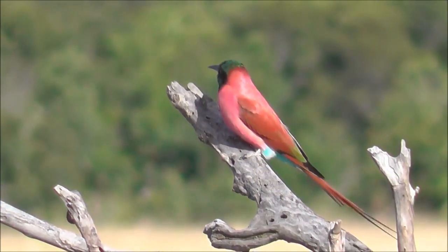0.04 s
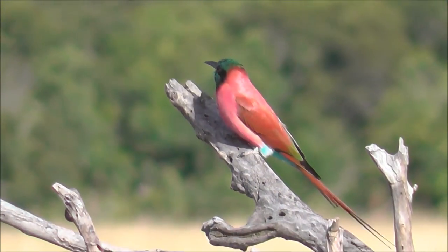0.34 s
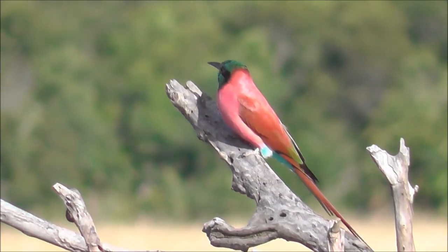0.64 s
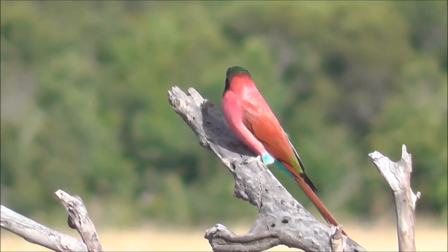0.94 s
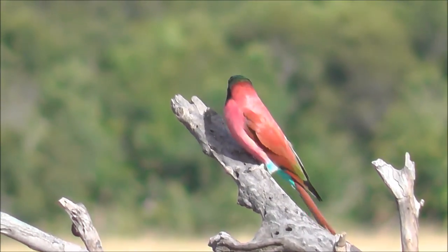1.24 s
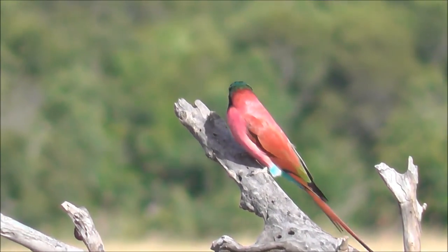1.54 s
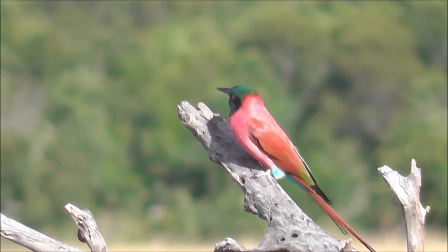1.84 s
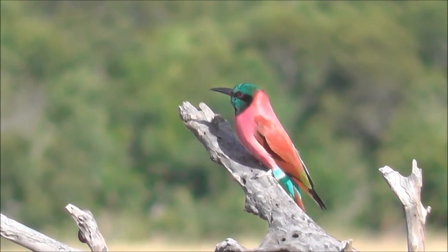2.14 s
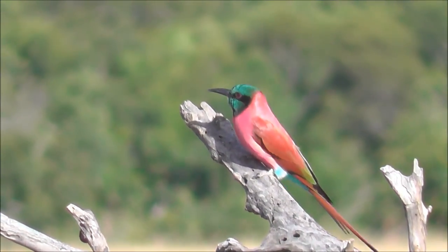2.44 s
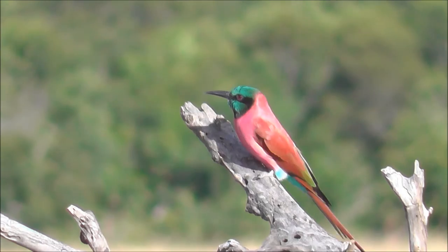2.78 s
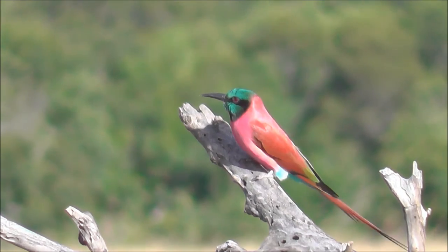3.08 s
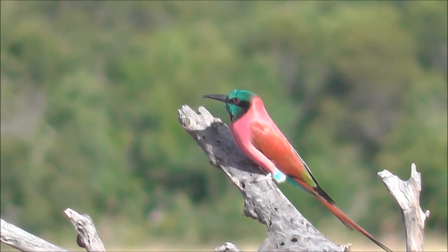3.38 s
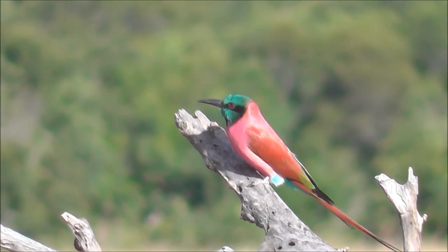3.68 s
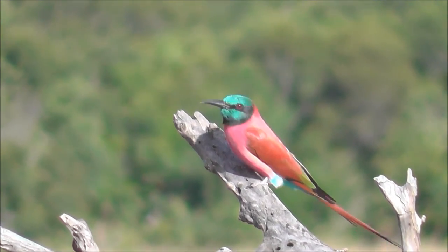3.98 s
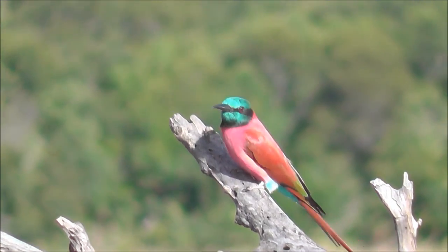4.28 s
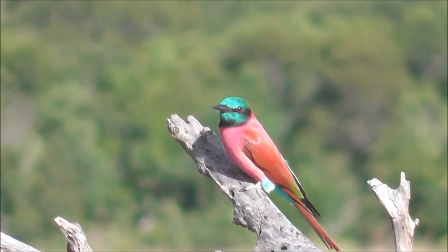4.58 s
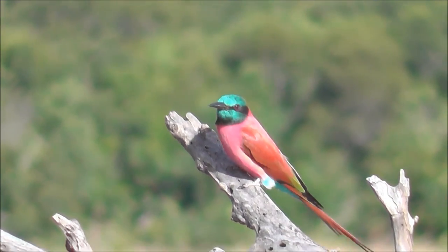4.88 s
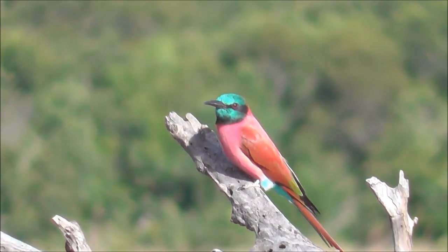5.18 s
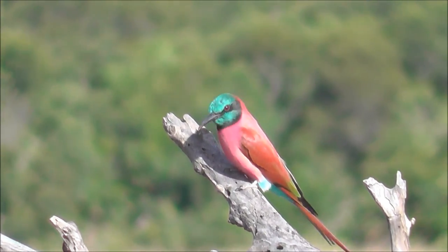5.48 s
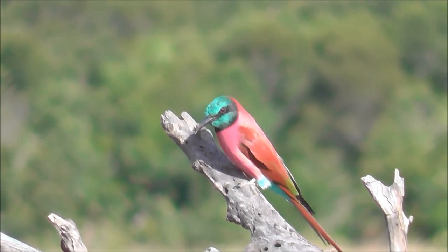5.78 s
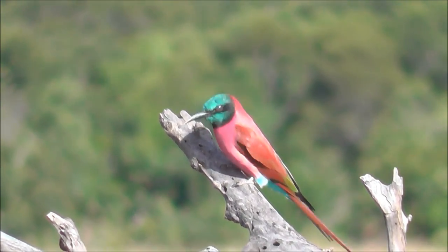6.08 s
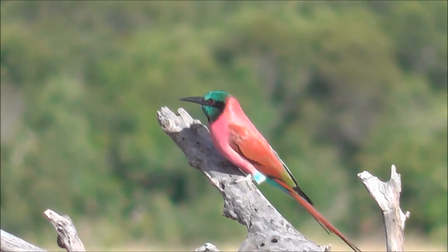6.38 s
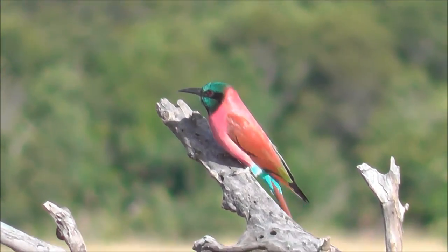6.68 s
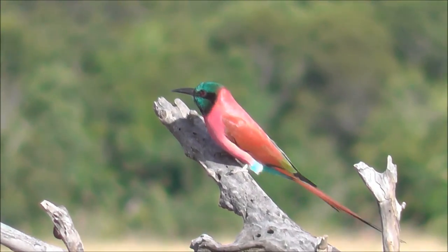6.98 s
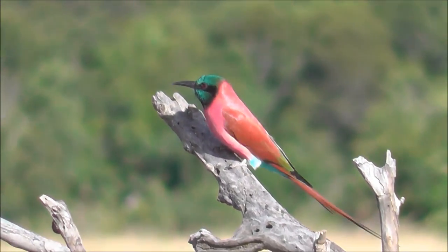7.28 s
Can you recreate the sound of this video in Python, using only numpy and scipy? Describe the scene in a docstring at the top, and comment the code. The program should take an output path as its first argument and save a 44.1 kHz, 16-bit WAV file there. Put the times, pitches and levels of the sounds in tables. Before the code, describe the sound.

A quiet outdoor scene near a wood, with faint high crickets pulsing about three times a second over a low murmur and steady microphone hiss. It opens with a brief soft scuff, a low hum and a puff of wind. Nearby birds give short, high, arched chirps and quick slides from 0.3 to 0.6 seconds, around 2 to 2.4, around 3.5 and at 4.8, with a slight echo. Wind rumbles and thumps on the microphone at 1.2 seconds, more strongly from 1.6 to 2.9, and again around 4.6 to 5.2. A few small dry clicks are scattered about, with one sharp click at 4.8 seconds, and a lens motor ticks very faintly. The busiest flurry of chirps comes from 5.6 to 5.9 seconds, over a barely audible distant bird's whistle. Gusts return from 6.7 seconds and rumble until the end, at about 7.4.

```python
"""Bee-eaters chirp in short arched notes and quick slides at the edge of a wood, which echoes faintly.
Crickets scrape their wings in threes. Gusts rumble and thump on the microphone, and the lens motor
ticks faintly as its steps ring the camera body. There is a brief scuff, a few dry clicks (one sharp)
and a far bird's whistle, all over a low outdoor murmur, a swelling hum and the microphone's hiss."""
import sys
import numpy as np
from scipy import signal
from scipy.fft import rfft, irfft
from scipy.io import wavfile
from scipy.ndimage import uniform_filter1d

SR = 44100
rng = np.random.default_rng(int(sys.argv[2]) if len(sys.argv) > 2 else 0)


def master_out(mix):
    """Clip the mix to full scale and print it as 16-bit PCM to the path in sys.argv[1]."""
    frames = np.transpose(np.atleast_2d(mix))
    ceiling = np.clip(frames, -1, 1)
    pcm = np.round(ceiling * 32767).astype(np.int16)
    wavfile.write(sys.argv[1], SR, pcm)


N = 327663
T = np.arange(N) / SR


def undb(db):
    """Turn decibels into a factor to multiply by."""
    return 10 ** (np.asarray(db) / 20)


def unit(x):
    """Scale a signal to an average strength (rms) of 1."""
    return x / np.sqrt(np.mean(x ** 2))


def colour(x, points):
    """Make some frequencies louder and others softer, along a curve of (f/Hz, gain/dB) points."""
    hz, db = np.transpose(points)
    f = np.maximum(np.fft.rfftfreq(N, 1 / SR), 1)
    return irfft(rfft(x) * undb(np.interp(np.log(f), np.log(hz), db)), N)


def noise(points):
    """Noise of strength 1, shaped by (f/Hz, gain/dB) points."""
    return unit(colour(rng.standard_normal(N), points))


def drift(rate):
    """A smooth random curve of strength 1 that changes about rate times a second."""
    f = np.fft.rfftfreq(N, 1 / SR)
    return unit(irfft(rfft(rng.standard_normal(N)) / (1 + (f / rate) ** 4), N))


def tone(hz):
    """A pure tone that follows a changing pitch."""
    return np.sin(2 * np.pi * np.cumsum(hz) / SR)


def add(out, start, sound):
    """Mix a sound into out at a start time in seconds."""
    i = max(int(start * SR), 0)
    out[i:i + len(sound)] += sound[:max(N - i, 0)]


def tree_echo(x, echo_db, fade_s):
    """Trunks and leaves scatter the sound, adding a short blurred echo."""
    t = T[:SR // 2]
    build_up = 1 - np.exp(-t / 0.042)
    tail = rng.standard_normal(len(t)) * np.exp(-np.log(1000) * t / fade_s) * build_up
    return x + undb(echo_db) * signal.fftconvolve(x, tail / np.linalg.norm(tail))[:N]


def wind_strength(rise_s=0.0044, drop_s=0.0037, wake_db=-8.5, wake_s=0.064, flutter_db=3):
    """Over a fluttering breeze, each gust rises, holds, drops and leaves a wake of weak swirls."""
    # light air between the gusts: t/s, level/dB
    breeze = [(0, -73), (.35, -61), (.7, -59.5), (1.1, -53.5), (1.45, -68), (1.9, -58), (2.7, -55),
              (3.2, -58), (3.6, -67), (4.1, -60), (4.4, -72), (4.9, -61), (5.5, -64), (5.9, -66.5),
              (6.4, -68), (6.85, -57.5), (7.43, -57)]
    # gusts on the microphone: start/s, length/s, level/dB
    gusts = [(0, 0.23, -46.5), (0.049, 0.052, -38), (0.835, 0.17, -52.5), (1.156, 0.063, -36.5),
             (1.62, 0.073, -45), (1.803, 0.014, -51), (2.063, 0.07, -34.5), (2.41, 0.033, -33),
             (2.524, 0.052, -32.5), (2.65, 0.15, -43), (2.81, 0.1, -48), (3.886, 0.077, -53.5),
             (4.605, 0.11, -44.5), (4.992, .16, -46), (5.33, 0.3, -58.5), (6.694, 0.025, -41.5),
             (7.068, 0.099, -41), (7.196, 0.11, -33), (7.31, 0.27, -37)]
    power = undb(np.interp(T, *np.transpose(breeze)) - 1 + flutter_db * drift(16)) ** 2
    for start, length, db in gusts:
        before, after = np.maximum(start - T, 0), np.maximum(T - start - length, 0)
        fade = np.maximum(np.exp(-after / drop_s), undb(wake_db) * np.exp(-after / wake_s))
        power += (undb(db) * np.exp(-before / rise_s) * fade) ** 2
    return uniform_filter1d(np.sqrt(power), size=200)


def wind(rumble_db=0.73, thump_db=-2, swirl_s=0.0012):
    """Swirling air rumbles on the microphone as hard as the wind blows; a big swirl thumps once."""
    # tone colour of the rumble: f/Hz, gain/dB
    spectrum = [(25, -50), (50, -20.5), (80, -8.5), (125, -3), (180, .5), (240, -9), (310, -21.5),
                (400, -35), (480, -42.5), (650, -43), (1000, -45), (2000, -54), (4000, -68), (8000, -82)]
    # big swirls hitting the microphone: t/s, level/dB
    buffets = [(0.097, -26), (1.205, -29), (1.678, -20.5), (2.016, -25.5), (2.065, -35.5), (2.332, -34.5),
               (2.412, -22.5), (2.538, -22.5), (2.669, -26.5), (2.756, -24), (2.829, -29.5), (4.605, -30),
               (4.99, -37), (5.086, -31), (5.121, -31.5), (5.2, -38), (5.34, -44), (5.446, -38.5),
               (6.706, -26.5), (6.743, -33.5), (6.991, -33), (7.108, -27), (7.155, -27.5), (7.197, -25),
               (7.247, -20.5), (7.383, -26.5)]
    swirls = noise(spectrum)
    # even out the noise, so that the wind's strength sets how loud it is
    own_level = np.sqrt(uniform_filter1d(uniform_filter1d(swirls ** 2, size=800), size=600))
    rumble = swirls / own_level * wind_strength() * undb(rumble_db)
    u = (T[:SR // 40] - .006) / swirl_s
    pressure_dip = (u ** 2 - 1) * np.exp(-u ** 2 / 2)
    thumps = np.zeros(N)
    for start, db in buffets:
        add(thumps, start, undb(db + thump_db) * pressure_dip)
    return rumble + colour(thumps, [(30, -18), (120, 6.5), (260, -1), (420, -13.5), (1000, 10)])


def low_hum(hz=152, waver=0.0095):
    """A low hum wavers in pitch and swells now and then."""
    # swells of the hum: peak/s, half length/s, level/dB
    swells = [(0.066, 0.083, -38.5), (0.71, 0.11, -58.5), (2.169, 0.12, -44.5), (4.08, 0.22, -60.5),
              (5.752, 0.13, -61), (6.058, 0.085, -56)]
    hum = unit(tone(hz * (1 + waver * drift(5.1))))
    return hum * sum(undb(db) * np.exp(-((T - peak) / half) ** 2) for peak, half, db in swells)


def land_murmur(gain_db=0.3, wander_db=3.0):
    """The open land murmurs; nine bands of its noise each swell and fade on their own."""
    # tone colour of the murmur: f/Hz, gain/dB
    spectrum = [(30, -104), (100, -83.5), (210, -77), (300, -78.5), (430, -99.5), (640, -91), (820, -94.5),
                (1000, -94), (1200, -100), (1500, -105), (2200, -101.5), (2500, -111), (4100, -112),
                (7000, -120)]
    # its slow rise and fall: t/s, level/dB
    levels = [(0, -63), (1.3, -59.5), (2.0, -62.5), (3.1, -60.5), (3.6, -63.5), (4.5, -65), (5.2, -61),
              (6.4, -66.5), (6.8, -63.5), (7.43, -67.5)]
    murmur = noise(spectrum)
    bins = rfft(murmur)
    half_octaves = 2 * np.log2(np.maximum(np.fft.rfftfreq(N, 1 / SR), 1) / 250)  # above 250 Hz
    for band in range(9):
        part = irfft(bins * np.maximum(1 - np.abs(half_octaves - band), 0), N)
        murmur += part * (undb(wander_db * drift(11.4)) - 1)
    return unit(murmur) * undb(np.interp(T, *np.transpose(levels)) + gain_db)


def microphone_hiss(level_db=-62):
    """The microphone adds a steady high hiss of its own."""
    # tone colour of the hiss: f/Hz, gain/dB
    spectrum = [(3500, -44), (4400, -51), (5000, -23), (5700, -15), (6900, -11.5), (7700, -22.5),
                (8500, -8.5), (9600, -0.5), (11000, 0.5), (11900, 0.5), (12600, -2.5), (15500, -5)]
    return noise(spectrum) * undb(level_db)


def lens_motor(steps_per_s=50, firm_db=-4, idle_db=-3, whirr_db=-9):
    """The lens motor moves in tiny steps; each is a short rub that makes the camera body ring."""
    # the firmer steps: t/s, level/dB
    firm_steps = [(0.175, -54.5), (.214, -60), (.2942, -60), (.3546, -59), (.4544, -59.5), (1.0944, -58.5),
                  (1.172, -58.5), (3.375, -59), (3.3942, -62), (3.4141, -61), (3.454, -62), (3.474, -60),
                  (3.595, -62), (3.6142, -64), (4.8743, -60), (4.915, -58.5)]
    # how busy the motor is otherwise: t/s, level/dB
    activity = [(0, -70.5), (.35, -69.5), (.7, -82.5), (1.2, -71.5), (1.6, -81.5), (2.2, -72.5),
                (3.0, -92.5), (3.6, -71.5), (4.2, -76.5), (5.4, -71), (6.2, -78), (7.43, -74.5)]
    # tones the camera body rings with: f/Hz, width/Hz, level/dB
    body_tones = [(922, 36, 8.5), (1310, 250, -2.5), (1677, 46, 6), (1992, 107, 1.5), (2186, 137, 5.5),
                  (2840, 320, -15.5), (3240, 97, -9), (5680, 280, 3), (6640, 580, -5.5)]
    push = np.exp(-((T[:SR // 100] - .005) / 0.0034) ** 2)
    firm, idle = np.zeros(N), np.zeros(N)
    for when, db in firm_steps:
        add(firm, when - .004, undb(db + firm_db) * push)
    for when in np.arange(.015, T[-1], 1 / steps_per_s):
        add(idle, when - .004, rng.random() ** 2 * push)
    idle = unit(idle + undb(whirr_db))
    idle *= undb(np.interp(T, *np.transpose(activity)) + idle_db + 2 * drift(8.9))
    rub = np.maximum(firm, idle) * rng.standard_normal(N)
    t = T[:SR // 25]
    ring = sum(undb(db) * width * np.cos(2 * np.pi * hz * t) * np.exp(-np.pi * width * t)
               for hz, width, db in body_tones)
    return signal.fftconvolve(rub, ring / np.linalg.norm(ring))[:N]


def scuff(peak_s=.018, half_length_s=0.013, level_db=-51):
    """One brief hissing scuff: a puff of bright noise."""
    hiss = noise([(1000, -8), (2300, -8), (4000, -17), (7000, -1.5), (7800, -8), (9500, -0.5),
                  (15000, -4)])
    return hiss * undb(level_db) * np.exp(-((T - peak_s) / half_length_s) ** 2)


def crickets(pitch_hz=5040, scatter_hz=35.2, spacing_s=0.035, stroke_s=.024, sag=0.063, gain_db=-3.5):
    """Three wing strokes make a chirp; the wings scrape unevenly and the pitch sags in each stroke."""
    # cricket chirps: middle of the first stroke/s, level/dB
    chirps = [(.139, -65.5), (.487, -67), (.797, -67), (1.113, -66.5), (1.73, -72), (2.146, -70),
              (2.486, -65.5), (2.655, -69), (2.877, -67.5), (3.205, -71), (3.585, -66), (3.887, -68),
              (4.24, -69), (4.62, -68), (4.93, -67), (5.24, -71.5), (5.595, -65), (6.022, -69.5),
              (6.358, -65), (6.683, -70), (7.05, -69.5)]
    out = np.zeros(N)
    progress = np.linspace(0, 1, int(stroke_s * SR))
    for when, db in chirps:
        hz = pitch_hz + scatter_hz * rng.standard_normal()
        stroke = np.sin(np.pi * progress) * tone(hz * (1 - sag * (progress - .5)))
        for k, uneven_db in enumerate(rng.standard_normal(3)):
            add(out, when + k * spacing_s - stroke_s / 2, undb(db + gain_db + uneven_db) * stroke)
    scrape = undb(3.8 * drift(200) - .7)
    # farther crickets blend into a faint chorus
    chorus = noise([(4200, -49), (4700, -7.5), (4950, -7.5), (5200, -7.5), (5700, -53)])
    chorus *= undb(-83.5 + 2 * drift(6.6))
    return tree_echo(out * scrape, echo_db=-2.5, fade_s=0.24) + chorus


def bird_note(hz, octave_db, rasp, softness, flutter_db=2.5, rasp_db=2.0):
    """A gliding tone and its octave, with soft ends; rasp shakes its pitch and loudness."""
    t = T[:len(hz)]
    jitter = np.interp(t * 1600, np.arange(200), rng.standard_normal(200))
    flutter = np.interp(t * 700, np.arange(200), rng.standard_normal(200))
    shaky_hz = hz * (1 + .08 * rasp * jitter)
    swell = np.abs(np.sin(np.pi * t / t[-1]))
    strength = swell ** softness * undb((flutter_db + rasp_db * rasp) * flutter)
    return strength * (tone(shaky_hz) + undb(octave_db) * swell ** 2 * tone(2 * shaky_hz))


def bee_eaters(arch_db=-2.5, slide_db=-5, db_per_octave=12, climb_per_s=12):
    """The birds' notes arch over a top pitch, where they are loudest, or slide to an end pitch."""
    # arched notes: top/s, rise/s, fall/s, top pitch/Hz, end pitch/Hz, level/dB, octave/dB, rasp/0-1
    arches = [ (.264, .006, .016, 5800, 3430, -59.5, 12.5, 0.24),
              (.287, 0.01, 0.022, 4700, 3120, -59.5, 9, 0.14),
              (.357, 0.034, 0.015, 5830, 3920, -44.5, -9, 0.03),
              (.362, 0.0043, 0.014, 4750, 3180, -58, 3, 0.1), (.488, .005, .022, 4430, 3000, -68, -10, 0),
              (0.504, .006, 0.04, 6140, 4900, -62.5, 3, 0.94),
              (.574, 0.015, 0.012, 6000, 5100, -49, -4, 0.4),
              (.572, 0.019, 0.036, 4670, 3180, -62, 12, .26),
              (1.879, .008, 0.021, 5730, 3400, -60, -7, 0.5),
              (1.986, .038, .018, 4250, 3180, -61, -12, 0.4),
              (2.264, 0.016, 0.019, 4930, 4100, -52, 1.5, 0), (2.352, .031, 0.029, 4660, 3700, -62, 3, 0.3),
              (3.434, 0.011, .012, 6000, 4670, -51.5, -20, .11),
              (3.524, .028, 0.036, 4250, 2860, -62, -2, 0.24),
              (3.671, 0.011, .018, 5000, 3170, -59, 2.5, 0.3),
              (3.749, 0.02, 0.01, 6090, 4400, -50.5, -17, 0.37),
              (4.747, 0.016, .029, 4860, 3270, -60, 6, 0.1),
              (5.604, .005, .016, 5970, 4900, -62.5, -10, 0.2),
              (5.690, .018, .014, 5900, 5430, -60, -2, 0.4),
              (5.691, .012, 0.029, 5000, 4640, -60.5, 6, 0.65),
              (5.807, .015, 0.011, 5650, 2880, -54.5, 0, 0.5),
              (5.825, .008, 0.037, 6570, 6200, -57, -17, 0.6),
              (5.835, .012, 0.018, 5260, 5200, -54, 3, 0.7),
              (5.883, 0.0052, 0.016, 5990, 4700, -51, 8, 0.7), (5.889, .012, .036, 4790, 3820, -59, 8, 0.8)]
    # quick slides: start/s, length/s, start pitch/Hz, end pitch/Hz, level/dB, octave/dB
    slides = [(0.369, 0.018, 8000, 4020, -55, -4), (0.533, .029, 3010, 5930, -49.5, 0),
              (0.589, 0.03, 8400, 4450, -51.5, -4), (2.001, 0.017, 7900, 3600, -53, -6.5),
              (2.372, 0.023, 7950, 3530, -60.5, -14), (3.541, 0.032, 7000, 3900, -57.5, -14),
              (3.703, 0.035, 3040, 6060, -51.5, -22), (4.766, 0.016, 9100, 4130, -51.5, -18),
              (5.658, 0.0303, 4900, 5430, -51, 0), (5.702, 0.013, 9100, 5700, -52.5, -20),
              (5.808, 0.037, 6400, 3170, -57, 6), (5.85, .019, 3690, 6150, -42.5, -2)]
    out = np.zeros(N)
    for top, rise, fall, top_hz, end_hz, db, octave_db, rasp in arches:
        t = T[:int((rise + fall) * SR)] - rise
        # an arch starts lower the longer it climbs, and falls ever faster to its end
        sag_before = climb_per_s * rise * np.abs(t / rise) ** 5
        sag_after = (1 - end_hz / top_hz) * np.abs(t / fall) ** 1.7
        pitch_ratio = np.maximum(1 - np.where(t < 0, sag_before, sag_after), .3)
        note = bird_note(top_hz * pitch_ratio, octave_db, rasp, softness=0.39)
        add(out, top - rise, undb(db + arch_db + db_per_octave * np.log2(pitch_ratio)) * note)
    for start, length, start_hz, end_hz, db, octave_db in slides:
        glide = 1 - np.exp(-2.7 * np.linspace(0, 1, int(length * SR)))  # fast, then settling
        hz = start_hz + (end_hz - start_hz) * glide / glide[-1]
        add(out, start, undb(db + slide_db) * bird_note(hz, octave_db, rasp=0.24, softness=0.65))
    out = colour(out, [(3000, -1), (7000, 0), (7750, -12), (8600, -5), (9500, 0), (10500, -1),
                       (11500, -10), (14000, -20)])
    near = tree_echo(out, echo_db=-10, fade_s=.025)  # near branches roughen each note
    return tree_echo(near, echo_db=-21, fade_s=.25)  # the far wood barely answers


def dry_clicks(low_cut_hz=850):
    """Each click is a crack of noise and a very short ring, from something too small to make bass."""
    # clicks: t/s, level/dB, brightness/dB
    clicks = [(0.7825, -49.5, -22), (1.0379, -47.5, -10.5), (1.4541, -47.5, -23), (2.7837, -40.5, -33),
              (4.8207, -43.5, 1.5), (5.208, -48.5, -28)]
    # tones a click rings with: f/Hz, level/dB, time to fade by 60 dB/s
    ring_tones = [(1020, 0, 0.007), (1770, -17, 0.057), (2340, -9.5, 0.031), (3090, -8, 0.0095),
                  (4800, -27, .008), (5530, -14, 0.014), (6350, -8, 0.014), (6980, 2.5, 0.015),
                  (6800, -21, .009), (9200, -3.5, 0.014), (11340, 1.5, 0.011), (12100, -5, .009),
                  (12900, 2, 0.01), (14400, -8, .003)]
    out, t = np.zeros(N), T[:SR // 20]
    for start, level_db, bright_db in clicks:
        ring = sum(undb(db + bright_db * hz / 10000 - 60 * t / fade_s) * np.sin(2 * np.pi * hz * t)
                   for hz, db, fade_s in ring_tones)
        crack = undb(2.5 + bright_db / 2) * rng.standard_normal(len(t)) * np.exp(-t / 0.002)
        add(out, start, undb(level_db) * (ring + crack))
    out = signal.sosfilt(signal.butter(4, low_cut_hz, "high", fs=SR, output="sos"), out)
    return tree_echo(out, echo_db=-21, fade_s=0.11)


def far_whistle(start_s=5.52, length_s=0.48, top_hz=1004, rise_hz=36, rise_s=.19, level_db=-72.5):
    """A far bird whistles one note that rises a little and levels off."""
    age = np.clip(T - start_s, 0, length_s)
    hz = top_hz - rise_hz * np.exp(-age / rise_s)
    whistle = unit(tone(hz * (1 + 0.0025 * drift(15))))
    swell = np.sqrt(np.abs(np.sin(np.pi * age / length_s)))
    return whistle * swell * undb(level_db + 2 * drift(14))


def scene():
    """All the sounds add up at one microphone."""
    foreground = bee_eaters() + crickets() + wind() + dry_clicks() + scuff() + lens_motor()
    background = far_whistle() + low_hum() + land_murmur() + microphone_hiss()
    return (foreground + background)[None]


def record(dry):
    """The recorder cuts off the highest treble, above 15750 Hz."""
    return signal.sosfilt(signal.ellip(10, .2, 60, 15750, fs=SR, output="sos"), dry)


dry = scene()
out = record(dry)
master_out(out)
```